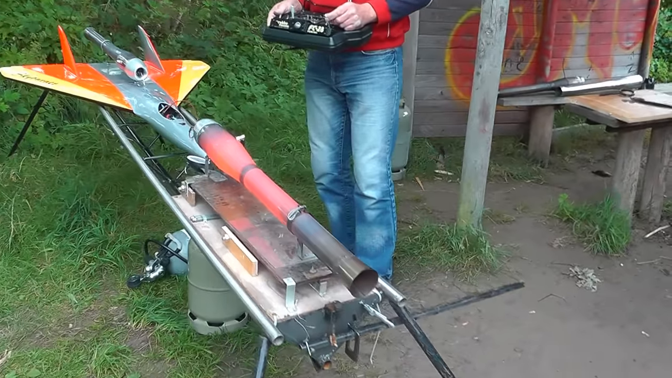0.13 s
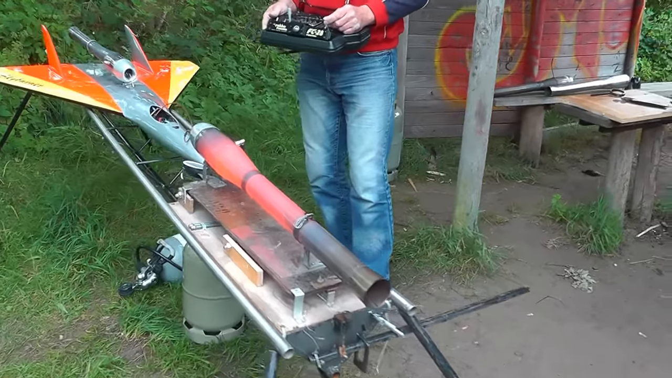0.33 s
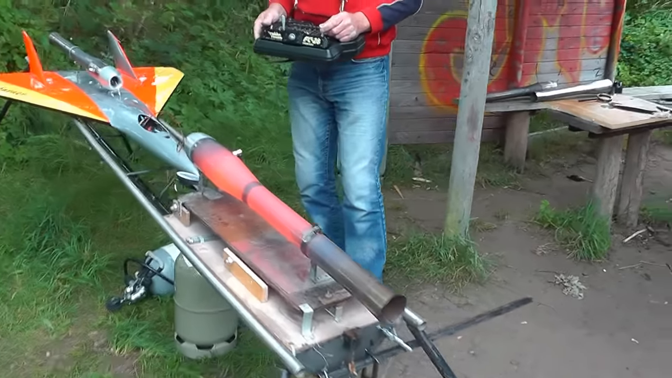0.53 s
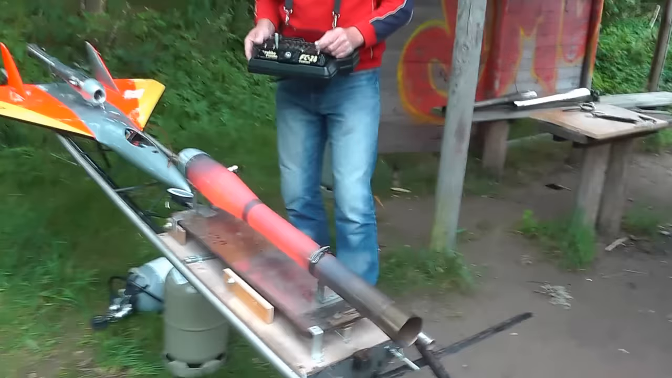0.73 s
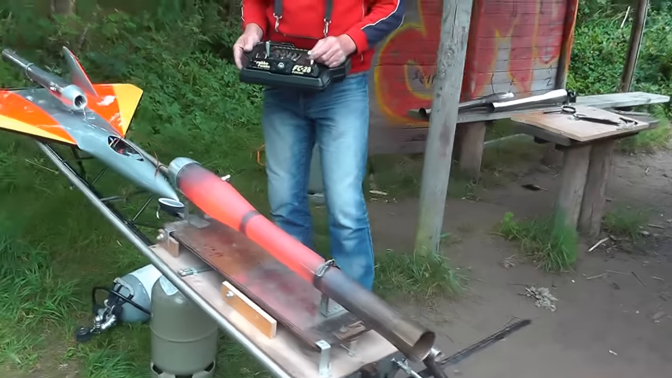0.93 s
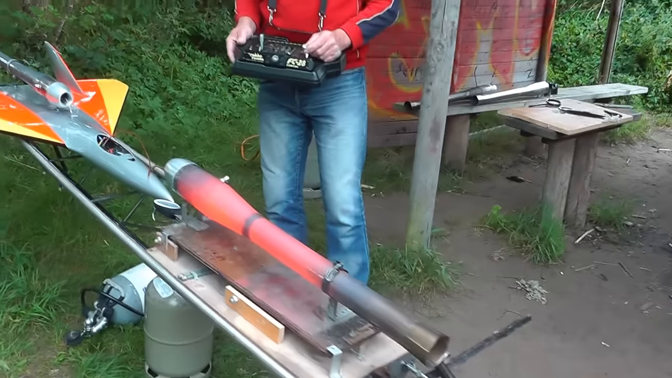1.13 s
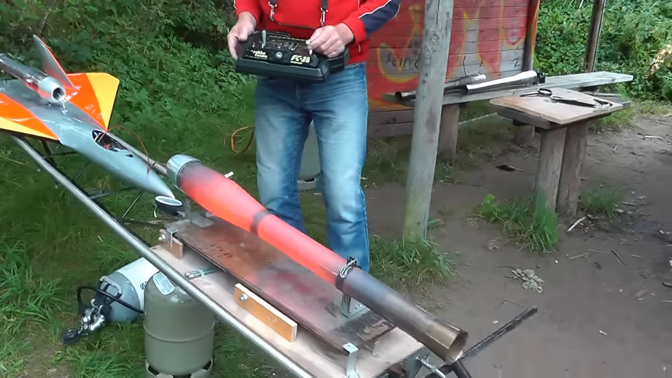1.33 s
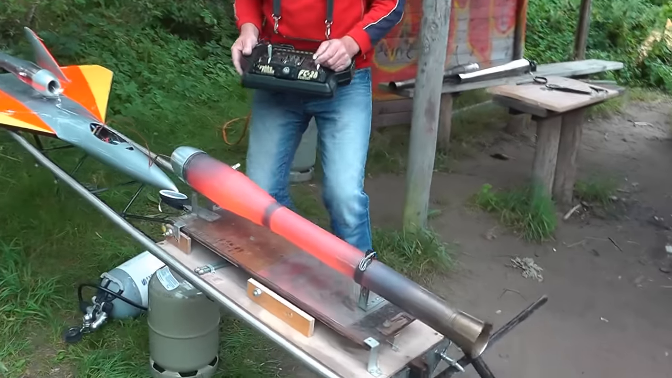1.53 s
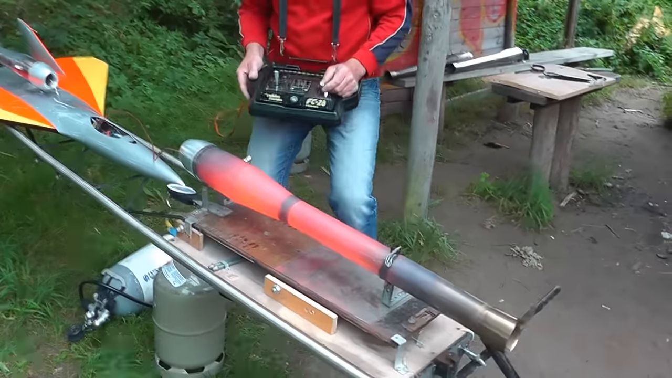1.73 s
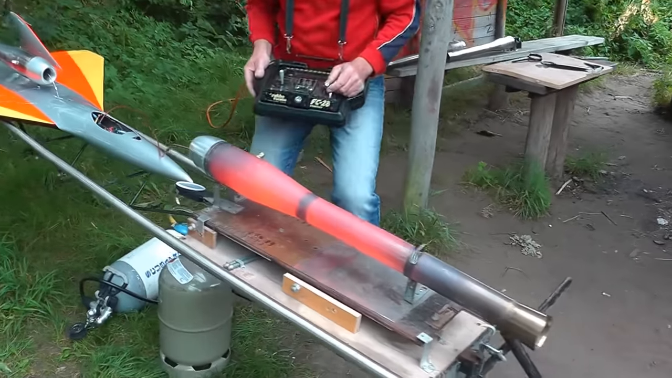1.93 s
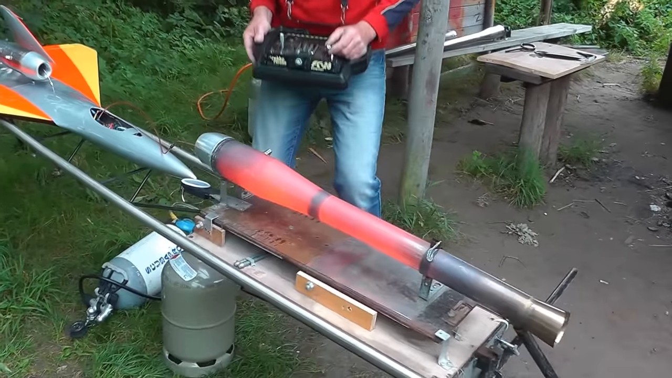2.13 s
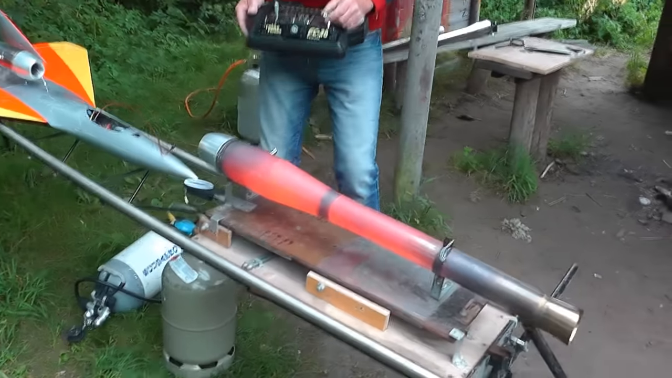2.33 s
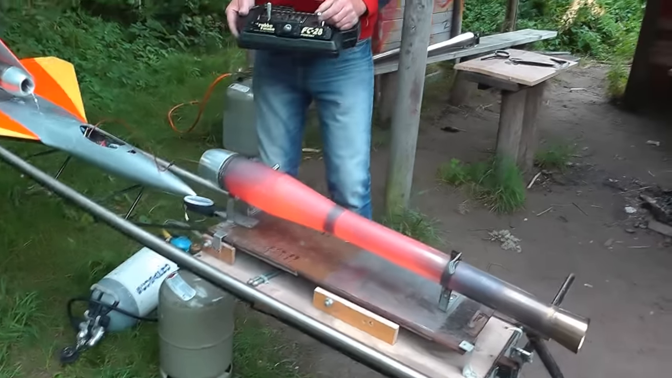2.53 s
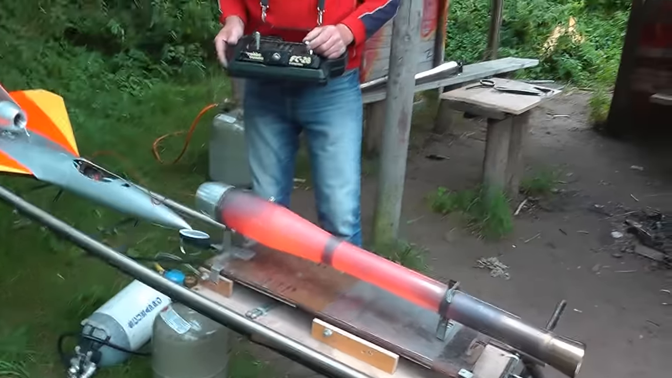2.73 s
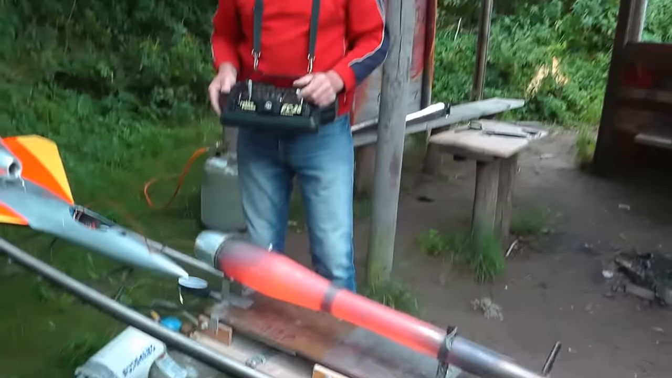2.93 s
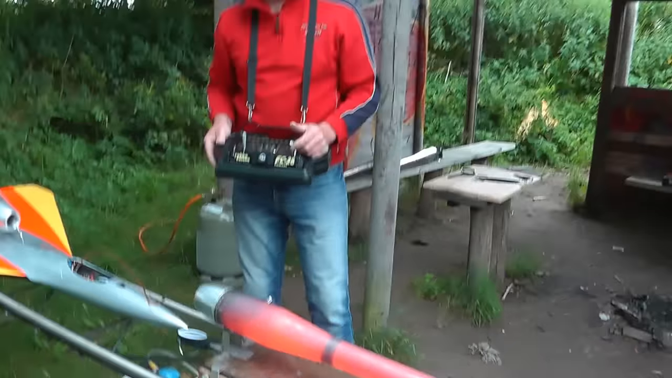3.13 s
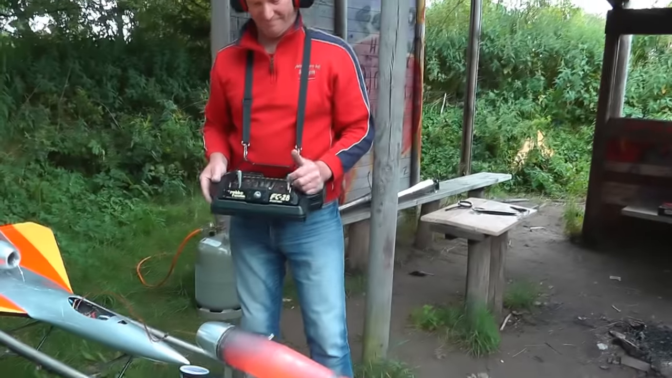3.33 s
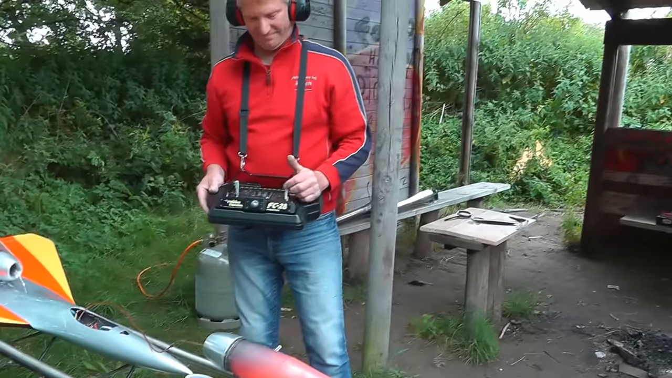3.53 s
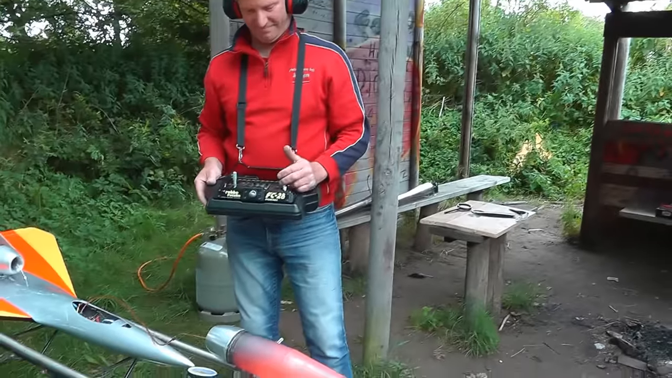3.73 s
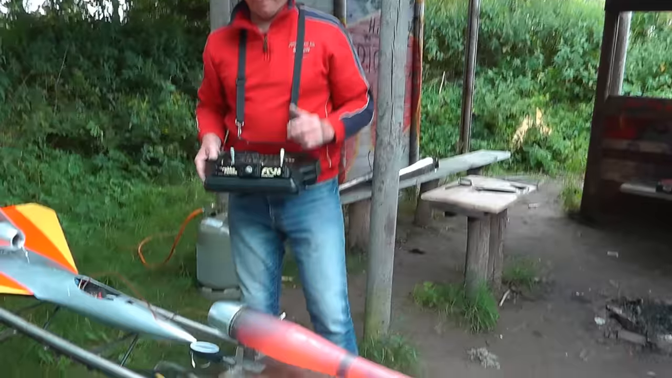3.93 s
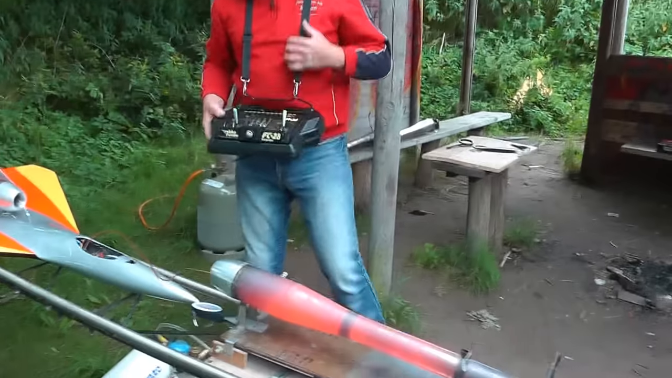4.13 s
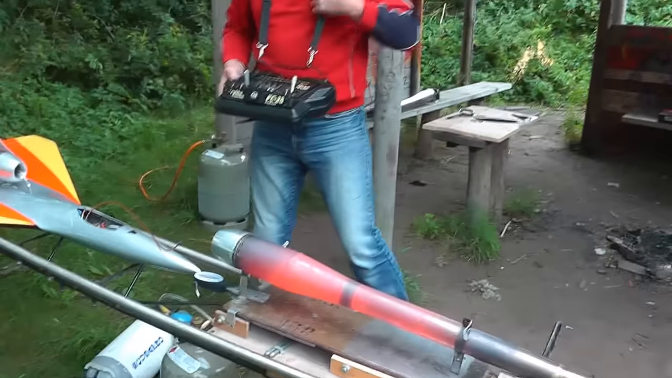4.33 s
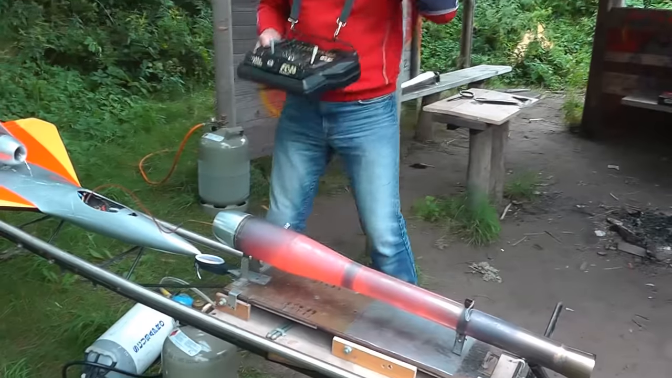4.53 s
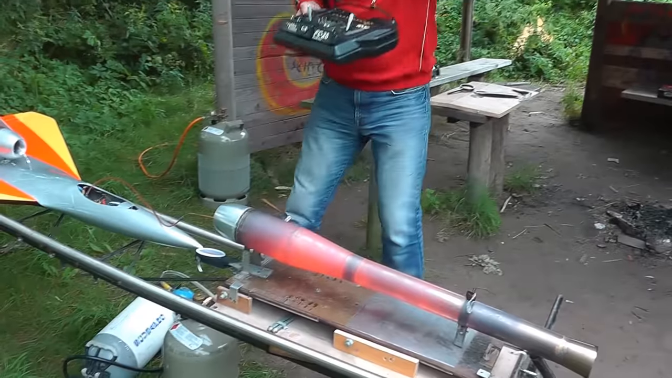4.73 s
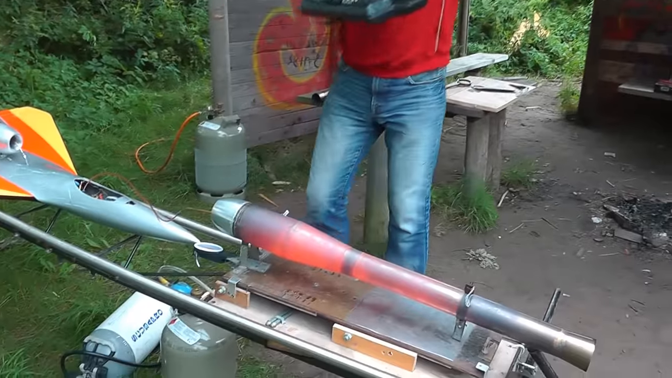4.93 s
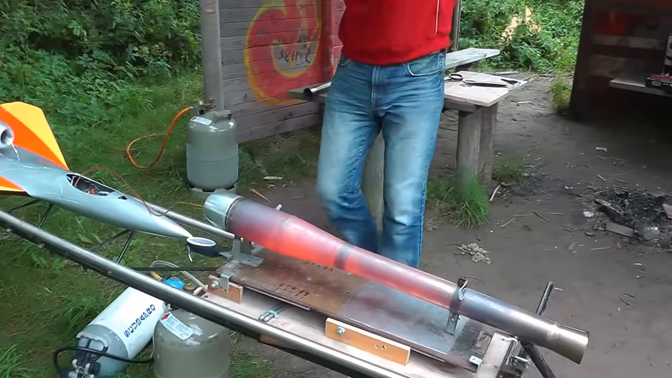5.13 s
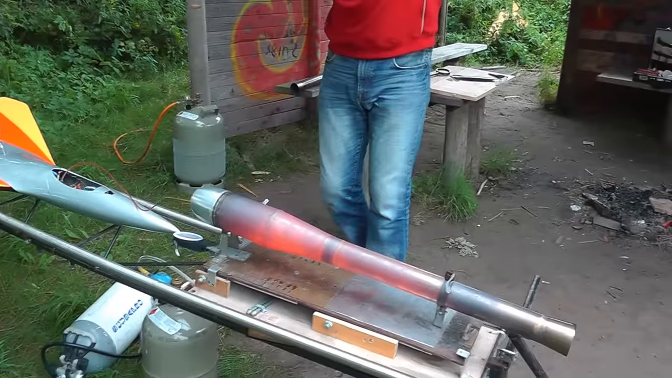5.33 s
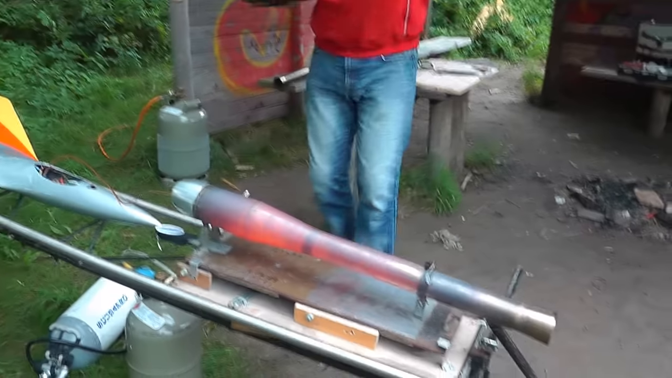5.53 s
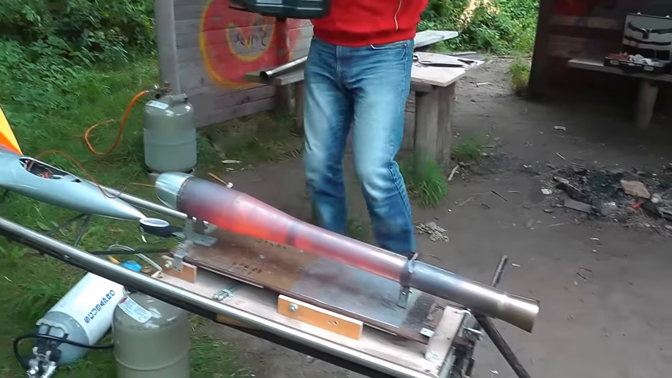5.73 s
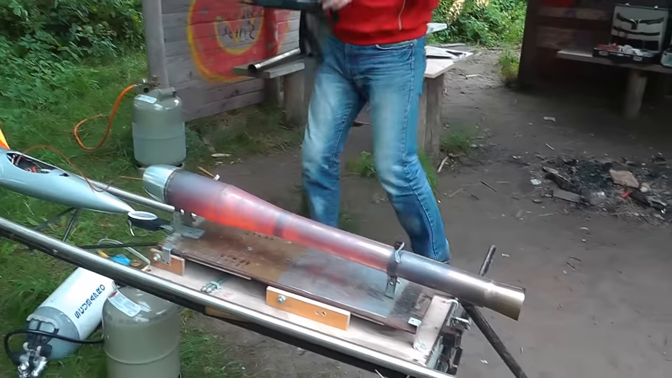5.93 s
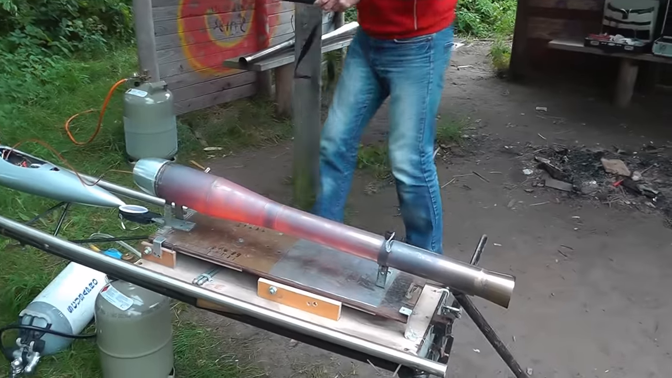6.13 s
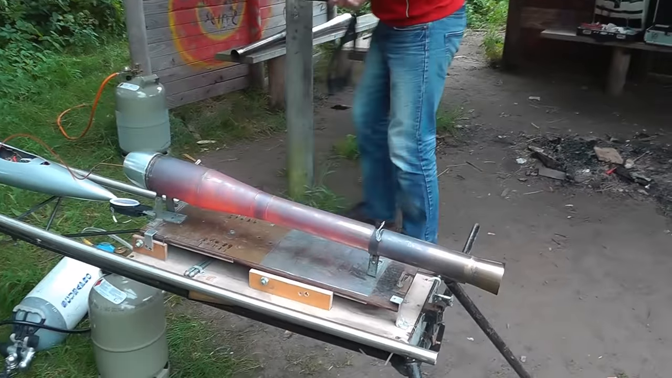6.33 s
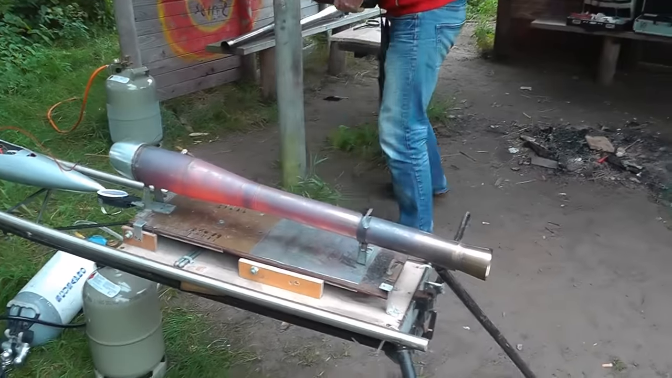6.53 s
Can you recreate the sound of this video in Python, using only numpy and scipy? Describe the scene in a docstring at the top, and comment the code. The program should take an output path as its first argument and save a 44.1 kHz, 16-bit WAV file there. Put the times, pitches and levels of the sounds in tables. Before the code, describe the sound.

Deafening steady rasping engine roar for three and a half seconds, sudden cut-off with echoing decay, then quiet pings, scuffs on dirt and small knocks.

```python
"""Pulsejet run and flame-out

A pulsejet runs on a test stand in a wooded yard: about 133 shock fronts a second in crackling jet noise,
plus a pipe tone, all driven by one firing cycle, while the camera moves from behind its nozzle to its side.
It flames out with a short hoot of gliding harmonics. As the camera's gain comes back up, the hot pipe ticks
(noise cracks ringing modes) and someone steps over the dirt (filtered grit) amid short knocks, some on plastic.
"""
import sys
import numpy as np
from scipy import signal
from scipy.fft import rfft, irfft
from scipy.io import wavfile
from scipy.ndimage import uniform_filter1d, minimum_filter1d

SR = 44100
rng = np.random.default_rng(int(sys.argv[2]) if len(sys.argv) > 2 else 0)


def store_pcm(level_fs):
    """Save levels as 16-bit WAV."""
    pcm = np.round(np.clip(level_fs, -1, 1) * 32767).astype(np.int16)
    wavfile.write(sys.argv[1], SR, np.atleast_2d(pcm).T)


N = 293685
T = np.arange(N) / SR
# fuel starts to run out; flame is gone
STARVE_S, OUT_S = 3.41, 3.486
# dry crack spectrum of slips, knocks and rustle: (frequency [Hz], level [dB per Hz])
CRACK_SPECTRUM = [(150, -8), (500, 0), (1200, 4.5), (2100, -2), (3300, -2), (5000, -4.5), (6500, -3),
                  (9000, -7), (15000, -5)]


def gain_of(db):
    """Decibels to amplitude."""
    return 10 ** (np.asarray(db) / 20)


def evened(x):
    """Scales to an rms of 1."""
    return x / np.sqrt(np.mean(x ** 2) + 1e-20)


def read(points, hz):
    """Interpolates a spectrum table on a log-frequency axis."""
    f, value = np.transpose(points)
    return np.interp(np.log(hz + 1), np.log(f + 1), value)


def curves(rows):
    """The columns of a time table at every sample."""
    s, *columns = np.transpose(rows)
    return [np.interp(T, s, c) for c in columns]


def add(mix, s, sound):
    """Mixes a sound in at time s."""
    part = mix[:, round(s * SR):][:, :sound.shape[-1]]
    part += sound[..., :part.shape[1]]


def wander(hz, size=8192):
    """Slow random curve of about rms 1, up to about hz."""
    f = np.fft.rfftfreq(size, T[-1] / size)
    slow = irfft(rfft(rng.standard_normal(size)) / (1 + (f / hz) ** 4))
    return evened(np.interp(T, np.linspace(0, T[-1], size), slow))


def colour(x, points, size=4096):
    """Causal minimum-phase filter with the given spectrum, so that attacks stay sharp."""
    log_gain = np.log(gain_of(read(points, abs(np.fft.fftfreq(size, 1 / SR)))))
    taps = np.fft.ifft(np.exp(signal.hilbert(log_gain).conj())).real[:size // 2]
    return signal.oaconvolve(np.atleast_2d(x), taps[None], axes=1)[:, :x.shape[-1]]


def spread(pair, side_db):
    """Two unrelated signals as the middle and the side of a stereo pair."""
    side = gain_of(side_db) * pair[1]
    return np.array([pair[0] + side, pair[0] - side])


def wide(side_db):
    """Two-channel white noise of a given width."""
    return spread(rng.standard_normal((2, N)), side_db)


def starving():
    """How far the fuel has run out: 0 at full burn, 1 when the flame is gone."""
    return np.clip((T - STARVE_S) / max(OUT_S - STARVE_S, .01), 0, 1)


def cycles():
    """Swings of the gas column so far: quicker as the fuel fails, slower as the pipe cools."""
    # wavers irregularly around 133 Hz: (time [s], firing rate [Hz])
    firing = [(.05, 131.4), (.11, 134.4), (.24, 133.9), (.39, 133), (.46, 133.1), (.52, 132.2),
              (.65, 134.3), (.72, 132.1), (.85, 132.1), (.89, 135.2), (.92, 132.4), (.96, 135.2),
              (1.05, 131.1), (1.11, 132.1), (1.135, 129.6), (1.16, 135.1), (1.24, 132), (1.31, 134.1),
              (1.37, 133), (1.58, 134.2), (1.68, 132.4), (1.72, 133), (1.75, 132.6), (1.78, 134.9),
              (1.82, 134.7), (1.86, 135.6), (1.92, 132.5), (2.01, 132), (2.05, 133.8), (2.1, 134.6),
              (2.13, 133), (2.17, 135.5), (2.22, 133.3), (2.27, 131.6), (2.34, 131.6), (2.39, 134.2),
              (2.45, 131.6), (2.56, 132.9), (2.69, 133.1), (2.72, 134.9), (2.92, 132.9), (2.98, 135.6),
              (3.01, 131.6), (3.05, 134.4), (3.14, 133.1), (3.2, 133.2), (3.27, 132.2), (3.34, 132.1),
              (3.38, 135.6)]
    free_hz, cold_hz, cool_s, cooling_s = 154.5, 133, 3.61, 0.12
    unsteady_share = .0015
    hz, = curves(firing)
    cooled = 1 - np.exp(-np.maximum(T - cool_s, 0) / cooling_s)
    hz = hz + (free_hz - hz) * starving() + (cold_hz - free_hz) * cooled
    return np.cumsum(hz * (1 + unsteady_share * wander(16))) / SR


def shocks(turns, jitter_s=.00013, uneven_db=-2.0):
    """One steep front a firing, never quite on time or equally strong, arriving by several paths."""
    # direct, then by ground and wall: (delay [s], level [dB])
    paths = [(0, 1.5), (.0012, -23), (.0028, -11.5)]
    fired = T[1:][np.diff(np.floor(turns)) > 0]
    out = np.zeros(N)
    for k, (delay_s, db) in enumerate(paths):
        late, size = rng.standard_normal((N // 100, 2))[:len(fired)].T
        at = np.clip((fired + delay_s + jitter_s * late) * SR, 0, N - 1).astype(int)
        out[at] += (-1) ** k * gain_of(db + uneven_db * np.minimum(size, 2))
    return evened(out - out.mean())


def stray_shocks(per_s=260, spread_db=0.5):
    """Eddies in the exhaust throw off hard cracks at random times."""
    size = gain_of(spread_db * np.minimum(rng.exponential(1, N), 2.5))
    cracks = size * (rng.random(N) < per_s / SR)
    return evened(cracks - cracks.mean())


def smear(x, smear_s=.0007):
    """Scattering round the camera draws each front out into a short rasp: delay grows with frequency."""
    hz = np.fft.rfftfreq(2 * N, 1 / SR)
    return irfft(rfft(x, 2 * N) * np.exp(-2j * np.pi * smear_s * hz ** 2 / SR))[:N]


def jet(turns, gate=0.18, gust_db=0.04, crackle_per_s=1400, crackle_spread_db=0.0, crackle_db=0.0):
    """Turbulence and small random shocks, swelling with the exhaust and with the intake of each cycle."""
    sign = rng.choice([-1, 1], (2, N))
    size = gain_of(crackle_spread_db * np.minimum(rng.exponential(1, (2, N)), 3.5))
    crackle = sign * size * (rng.random((2, N)) < crackle_per_s / SR)
    noise = rng.standard_normal((2, N)) + gain_of(crackle_db) * evened(crackle)
    swell = 1 + gate * np.cos(4 * np.pi * turns)
    return evened(noise * swell * gain_of(gust_db * wander(50)))


def pipe_tone(turns, angle, flutter_db=2.0, drift_db=0.95, port_phase_rad=0.55):
    """Standing wave in the pipe; overtones shift differently at the two ports and as the camera moves."""
    # (multiple of firing rate, then level [dB] at five camera positions from behind to side-on)
    overtones = [(1, -12, -5, -14.5, -8, -6.5), (2, -7.5, -16.5, -6.5, 3, 2),
                 (3, 1.5, -3, -14.5, -2.5, -3.5), (4, -3.5, 6, 4.5, -1, 4.5), (5, 2.5, 2.5, -5.5, 5, 3.5),
                 (6, 0.5, 1.5, -1, 6, 2), (7, -2.5, -7, -6.5, -0.5, -2), (8, -15.5, -14.5, 2, -4.5, -0.5),
                 (9, 3, 0.5, -2, -1.5, 5), (10, -10.5, -13.5, -10, -12, -14), (11, -5.5, -1, 1, -9.5, 2.5),
                 (12, -11, -4.5, -7, -3.5, -12.5), (13, -7.5, -17.5, -13.5, -15, -9),
                 (14, -15, -9, -15, -9.5, -11)]
    out = np.zeros((2, N))
    for k, *around_db in overtones:
        level_db = np.interp(angle, [0, .25, .55, .85, 1], around_db)
        level = gain_of(level_db + flutter_db * wander(14) + drift_db * wander(0.69))
        phase = 2 * np.pi * (round(k) * turns + rng.random())
        phase = phase + .2 * wander(20) + .25 * wander(6) + .8 * wander(1)
        apart = port_phase_rad * (rng.choice([-1, 1]) + 0.11 * wander(2.8))
        out += level * np.cos([phase + apart, phase - apart])
    return evened(out)


def lean(pair):
    """The nozzle lies to the right, so that side hears more of the rasp."""
    # left minus right: (frequency [Hz], level [dB])
    balance = [(60, 2.5), (300, 2), (700, -2.5), (2500, -3.5), (5000, -0.5), (10000, -2), (15000, 0.5)]
    sides = zip(pair, (1, -1))
    return np.vstack([colour(x, [(hz, sign * db / 2) for hz, db in balance]) for x, sign in sides])


def engine(turns, roar_db=10.5, tone_db=6.5, shock_db=-8.0, stray_db=-2.5, shock_beam_db=2.0,
           flicker_db=0.64, closer_db=1.0, edge_db=-0.6,
           starved_roar_db=-1.8, starved_edge_db=-8.0, starved_tone_db=-6.0):
    """The roar (shocks and jet noise) and the pipe tone, both driven by the firing cycle."""
    # (time [s], camera position: 0 behind the nozzle, 1 side-on)
    position = [(0.35, 0), (.95, 0.28), (1.5, 0.52), (2.05, 0.85), (2.5, 0.96)]
    # jet noise: (frequency [Hz], level [dB per Hz])
    roar_spectrum = [(25, -16), (60, -8), (120, -1), (200, -1.5), (400, 0), (800, 1.5), (1150, -0.5),
                     (1600, -1.5), (2200, -5), (3500, -8.5), (4800, -15), (6000, -10.5), (8200, -11.5),
                     (15500, -20.5)]
    # change of the roar side-on: (frequency [Hz], level [dB])
    side_on = [(100, 0), (700, -2), (1500, -2), (3000, 0.5), (4700, 2.5), (6000, -1), (8000, -3),
               (15000, -1.5)]
    # width of the jet noise: (frequency [Hz], side minus mid [dB])
    width = [(60, -1), (380, 1), (700, -2), (2400, -5.5), (4400, -19.5), (8100, -10.5), (15000, -1)]
    # after flame-out; the treble loses the second figure on top
    die_db_per_s, dull_db_per_s = 314, 121

    angle, = curves(position)
    starved, dead_s = starving(), np.maximum(T - OUT_S, 0)
    burn_db = closer_db * angle + starved_roar_db * starved - die_db_per_s * dead_s
    sharp_db = edge_db + starved_edge_db * starved - dull_db_per_s * dead_s
    mid, side = jet(turns)
    fronts = smear(shocks(turns) + gain_of(stray_db) * stray_shocks())
    fronts = colour(fronts, [(200, -4.0), (1500, -1.5), (4000, -2.5), (9000, 0.0)])[0]
    # fronts crack hardest straight behind the nozzle
    fronts = fronts * gain_of(-shock_beam_db * angle)
    roar = spread([mid + gain_of(shock_db) * fronts, colour(side, width)[0]], 0)
    roar = evened(colour(roar, roar_spectrum))
    roar = (1 - angle) * roar + angle * colour(roar, side_on)
    # the treble flickers and dulls as the fuel fails
    body = signal.sosfiltfilt(signal.butter(2, 1700, fs=SR, output="sos"), roar)
    edge = (roar - body) * gain_of(sharp_db + flicker_db * wander(22))
    tone = gain_of(tone_db + burn_db + starved_tone_db * starved) * pipe_tone(turns, angle)
    return lean(gain_of(roar_db + burn_db) * (body + edge)), lean(tone)


def tail(x, decay):
    """Diffuse reflections as decaying noise, each band dying at its own speed."""
    hz, t, z = signal.stft(rng.standard_normal((2, SR)), SR, nperseg=256)
    taps = signal.istft(z * 10 ** (-3 * t / read(decay, hz)[:, None]), SR, nperseg=256)[1]
    taps /= np.sqrt(np.mean(abs(rfft(taps)[:, 300:2000]) ** 2))
    return signal.fftconvolve(x, taps, axes=1)[:, :N]


def stirring():
    """Rises from 0 to 1 as the small sounds round the stand begin."""
    stir_s, rise_s = 4.86, .4
    return np.clip((T - stir_s) / rise_s, 0, 1)


def air(hush_db=-52.5, swell_db=-0.6, rustle_per_s=160, rustle_db=-70.0):
    """Outdoor hush as filtered noise, with tiny crackles of grit and clothes once the operator moves."""
    # (frequency [Hz], level [dB per Hz])
    hush_spectrum = [(30, -18), (70, -2.5), (130, -5.5), (260, 2), (500, -0.5), (900, -3.5), (1100, -6.5),
                     (1650, -7.5), (1810, -19.5), (2050, -14), (3400, -14.5), (5000, -21.5), (8000, -20.5),
                     (15500, -40)]
    hush = evened(colour(wide(-7.5), hush_spectrum)) * gain_of(swell_db * wander(11))
    specks = wide(-9.0) * (rng.random(N) < rustle_per_s / SR)
    rustle = stirring() * evened(colour(specks, CRACK_SPECTRUM))
    return gain_of(hush_db) * hush + gain_of(rustle_db) * rustle


def camera(whirr_db=-66.5, bump_s=0.0016):
    """The camera's hum (sines) and whirr (noise), and soft bumps of the hand that holds it (pulses)."""
    # (frequency [Hz], level [dB])
    hum = [(113, -69.5), (150.7, -74.5), (264, -75.5), (533, -78.5), (662, -81), (1061, -74.5),
           (1276, -77.5), (2143, -82)]
    # (frequency [Hz], level [dB per Hz])
    whirr_spectrum = [(30, -15.5), (90, 5.5), (250, -3), (380, -8.5), (520, -5.5), (1000, -0.5), (1600, -8),
                      (1800, -11), (2100, -12.5), (2700, -17.5), (6000, -31.5), (15000, -48.5)]
    # (time [s], level [dB])
    bumps = [(3.943, -47.5), (4.365, -49)]
    out = gain_of(whirr_db) * evened(colour(wide(-8.5), whirr_spectrum))
    for hz, db in hum:
        out += np.sqrt(2) * gain_of(db) * np.sin(2 * np.pi * hz * T + 0.28 * wander(5))
    u = np.arange(SR // 20) / SR / bump_s
    for s, db in bumps:
        add(out, s, gain_of(db) * u * (2 - u) * np.exp(1 - u))
    return out


def flameout(turns, rough_db=4.5, purity=0.25, unrest_rad=0.28, throb_hz=20, throb_depth=.9):
    """The gas column hoots roughly, its overtones fading first; a weak low tone lingers, throbbing."""
    # overtones at full swing: (multiple, level [dB], lag of the peak [s])
    hoot = [(1, -11, .014), (2, -18, 0.026), (3, -18, 0), (4, -1, 0), (5, -16.5, 0.0027), (8, -18, 0.0039)]
    hoot_s, hoot_db, swell_db_per_s, fade_db_per_s = 3.477, 17.5, 402.5, 365.5
    linger_db, linger_db_per_s = -31.5, 35
    out = np.zeros(N)
    for k, level_db, lag_s in hoot:
        since = T - hoot_s - lag_s
        db = np.minimum(swell_db_per_s * since, -fade_db_per_s * since) * (1 + purity * (k > 2.5))
        phase = 2 * np.pi * (round(k) * turns + rng.random()) + unrest_rad * k * wander(60)
        out += gain_of(hoot_db + level_db + db) * np.cos(phase)
    throb = 1 + throb_depth * np.cos(2 * np.pi * throb_hz * (T - OUT_S) + .5 * wander(8))
    linger = gain_of(linger_db - linger_db_per_s * abs(T - OUT_S)) * starving()
    return out * gain_of(rough_db * wander(33)) + linger * throb * np.cos(2 * np.pi * turns)


def whine(whine_hz=885.5, waver=0.0007):
    """A thin sine of nearly steady pitch that swells and fades."""
    # (time [s], level [dB])
    swell = [(3.7, -72), (4.7, -68.5), (5.0, -62), (5.6, -58), (6.1, -83)]
    db, = curves(swell)
    hz = whine_hz * (1 + waver * wander(4.7))
    return np.sqrt(2) * gain_of(db) * np.sin(2 * np.pi * np.cumsum(hz) / SR)


def ringing(t, modes, spot_hz, spot_db=7.5, spot_octaves=0.16, detune=0.0027, split=0.0042,
            partner_db=-7.0, partner_life=2.2):
    """Modes in beating pairs, the weaker partner singing on; the spot hit favours those near spot_hz."""
    ring = np.zeros((2, len(t)))
    for hz, level_db, t60 in modes:
        favour_db = spot_db * np.exp(-(np.log2(hz / spot_hz) / spot_octaves) ** 2)
        hz = hz * (1 + detune * rng.standard_normal())
        partner_hz = hz * (1 + split * rng.standard_normal())
        first, second = (np.sin(2 * np.pi * (f * t + rng.random((2, 1)))) for f in (hz, partner_hz))
        pair = first * gain_of(-60 * t / t60) + second * gain_of(partner_db - 60 * t / (t60 * partner_life))
        ring += gain_of(level_db + favour_db) * pair
    return ring


def strikes(rows, modes, side_db, body_t60, body_db, chatter_db=2.0, dry_share=0.52):
    """Each blow is a short, chattering crack that also rings the object, another mode mix at each spot."""
    out, t = np.zeros((2, N)), np.arange(SR // 3) / SR
    head = SR // 100  # levels are set over the first 10 ms
    for s, db, dull_hz, length_s, ring_db, spot_hz in rows:
        ring = ringing(t, modes, spot_hz)
        body = gain_of(body_db + dry_share * min(ring_db, 0) - 60 * t / body_t60)
        grip = (np.exp(-t / length_s) + body) * gain_of(chatter_db * wander(300)[:len(t)])
        crack = colour(rng.standard_normal((2, len(t))) * grip, CRACK_SPECTRUM)
        blow = crack / crack[:, :head].std() + gain_of(ring_db) * ring / ring[:, :head].std()
        blow *= 1 - np.exp(-t / (0.35 * length_s))  # a long slip also starts softly
        dull = signal.butter(2, min(dull_hz, SR / 2 - 1), fs=SR, output="sos")
        blow = signal.sosfilt(dull, spread(blow, side_db))
        add(out, s, gain_of(db) * blow / blow[:, :head].std())
    return out


def pipe_ticks():
    """The cooling pipe slips in its clamps, each slip ringing its modes."""
    # (time [s], level [dB], dull above [Hz], slip length [s], ringing against crack [dB], favoured mode [Hz])
    slips = [(4.318, -51, 5000, 0.0021, -6, 3210), (4.337, -47, 8960, 0.0017, -6, 4500),
             (4.541, -31.5, 9000, 0.0017, 3, 2150), (4.760, -40.5, 2600, 0.013, -8, 523),
             (5.110, -44, 7005, 0.0007, -15, 2137), (5.195, -38, 8950, 0.002, 2, 3130),
             (5.238, -54, 8000, .003, 4, 8800), (5.364, -38.5, 13000, 0.0018, 9, 1270),
             (5.405, -51, 6900, 0.0033, 13, 4640), (5.440, -36, 2500, .002, 0, 1260),
             (5.444, -35, 4500, 0.002, 0, 4600), (5.448, -37, 2500, 0.0028, 2, 517),
             (5.452, -40, 2500, 0.0017, 2, 523), (5.468, -39, 6960, 0.0022, -1, 4600),
             (5.475, -45.5, 4500, .002, 0, 1260), (5.520, -49, 15000, 0.0014, -10, 880),
             (5.563, -40.5, 4000, 0.0026, -6, 4600)]
    # (frequency [Hz], level [dB], t60 [s])
    pipe_modes = [(498, 2, 0.11), (540, -2, 0.12), (880, -3, .08), (1153, -2, .05), (1257, -2, 0.06),
                  (1680, -8, 0.08), (2140, -6, 0.097), (2700, -18, .05), (3220, -3, 0.038),
                  (3460, -9, 0.055), (4460, -8, 0.062), (4580, -1, 0.029), (4780, -3, 0.029),
                  (5430, 0, 0.036), (5740, -6, 0.055), (7390, -9, .08), (8000, -5, 0.08), (8400, -4, 0.073),
                  (8880, -4, .06)]
    return strikes(slips, pipe_modes, side_db=-24, body_t60=0.14, body_db=-13)


def ticking(tick_db=-69.0, tick_s=.0012, uneven_db=-3.0):
    """A faint, dry, regular ticking of decaying noise bursts, as of a small mechanism."""
    one_tick_s, ticks_per_s = 5.677, 13.34
    since = (T - one_tick_s) % (1 / ticks_per_s)
    clicks = wide(-11.0) * np.exp(-since / tick_s) * gain_of(uneven_db * wander(10))
    clicks = evened(colour(clicks, [(500, -15), (3000, 0), (8000, -10), (15000, -8)]))
    return gain_of(tick_db) * stirring() * clicks


def steps(heel_hz=200, heel_s=0.005, grit_db=4.0, clump_db=2.0, pebbles_per_s=700, pebble_db=-4.0):
    """A heel lands, then the sole rolls over clumps of grit and single pebbles that snap."""
    # (time [s], scuff level [dB], length [s], heel thud level [dB])
    footfalls = [(5.187, -51, 0.081, -47), (5.863, -48, 0.014, -40), (5.886, -45.5, 0.1, -54),
                 (6.352, -49, 0.043, -60), (6.401, -49.5, 0.071, -59)]
    # (frequency [Hz], level [dB per Hz])
    scuff = [(59, -45), (100, -26), (208, 1), (367, 1), (867, 3), (1350, -5), (1590, -3), (3000, -13),
             (4600, -19), (7500, -18.5), (15000, -31)]
    out, t = np.zeros((2, N)), np.arange(SR // 3) / SR
    for s, db, length_s, heel_db in footfalls:
        grit = rng.standard_normal((2, len(t)))
        grit = grit * gain_of(grit_db * wander(400) + clump_db * wander(49))[:len(t)]
        pebbles = rng.standard_normal((2, len(t))) * (rng.random(len(t)) < pebbles_per_s / SR)
        crunch = colour(evened(grit) + gain_of(pebble_db) * evened(pebbles), scuff)
        roll = np.interp(t, [0, .003, 0.6 * length_s, length_s], [0, 1, 1, 0])
        thud = t / heel_s * np.exp(2 - 2 * t / heel_s) * np.sin(2 * np.pi * heel_hz * t)
        add(out, s, gain_of(db) * evened(spread(crunch, -16.0)) * roll + gain_of(heel_db) * thud)
    return out


def short_knocks():
    """Short knocks with ringing modes, some on a plastic case, some within the footsteps."""
    # (time [s], level [dB], dull above [Hz], knock length [s], ringing against crack [dB], favoured mode [Hz])
    knocks = [(5.863, -51, 5000, .003, 2, 3400), (5.917, -55, 8000, .003, -4, 1440),
              (5.948, -48, 3000, .002, -2, 1120), (5.991, -57, 12000, .0007, -15, 4400),
              (6.029, -46.5, 3500, 0.0023, -8, 1450), (6.226, -47.5, 3500, 0.0082, -9, 2900),
              (6.237, -45, 4500, .004, -6, 3200), (6.358, -51, 9000, 0.0028, -14, 800),
              (6.378, -59, 2000, .002, 3, 1440), (6.409, -51, 11000, 0.0035, -21, 800),
              (6.438, -50, 1100, .003, 3, 795), (6.488, -47, 2500, 0.0037, -10, 2000),
              (6.608, -38.5, 3600, 0.0022, 3, 2000), (6.613, -41, 3600, 0.0029, 0, 2000),
              (6.631, -46, 3800, 0.0083, -8, 3200)]
    # (frequency [Hz], level [dB], t60 [s])
    knock_modes = [(800, -8, .05), (1130, -15, .035), (1480, -10, 0.049), (1570, -7, .04),
                   (2000, -4, 0.038), (2300, 1, .032), (2900, 0, .04), (3240, -6, 0.074), (3630, -4, .04),
                   (4400, -8, .05)]
    return strikes(knocks, knock_modes, side_db=-22, body_t60=0.15, body_db=-7.5)


def scene(shed_db=-11.0, woods_db=-37.0):
    """Roar, hoot and small sounds thrown back by the shed and woods; the pipe tone stays dry."""
    # narrow dips, slightly hollow: (frequency [Hz], level [dB])
    hollow = [(1700, -1), (1800, -9.5), (1920, 2), (2260, -1), (2380, -8), (2500, 0), (2990, -0.5),
              (3060, -8), (3140, 1)]
    # boards and trees: (delay [s], level [dB])
    echoes = [(0.071, -26.5), (0.117, -31), (.16, -41)]
    # decay of the nearby shed: (frequency [Hz], t60 [s])
    shed = [(40, 0.037), (150, 0.27), (600, 0.15), (3000, 0.34), (12000, 0.36)]
    # decay of the woods: (frequency [Hz], t60 [s])
    woods = [(130, .5), (250, 0.99), (800, 2.1), (3000, 1.5), (8000, .6), (15000, .3)]
    turns = cycles()
    roar, tone = engine(turns)
    blows = pipe_ticks() + short_knocks()
    near = roar + flameout(turns) + colour(blows + steps() + ticking(), hollow)
    # boards and leaves give back little of the highest treble
    thrown = colour(near, [(30, -6.0), (150, -3.0), (2500, 1.0), (6000, -4.0), (14000, -16)])
    echo = np.zeros((2, N))
    for delay_s, db in echoes:
        add(echo, delay_s, gain_of(db) * thrown[::-1])  # sides swapped
    diffuse = gain_of(shed_db) * tail(thrown, shed) + gain_of(woods_db) * tail(thrown, woods)
    return near + tone + diffuse + echo + air()


def record(dry, limit_db=-7.5, hold_s=0.97, recover_db_per_s=23.0, ceiling_db=0.0, edge_hz=15720):
    """Gain control holds the engine down, waits, then recovers; peaks clip with a fairly hard knee; band limit."""
    power = abs(uniform_filter1d((dry ** 2).mean(0), size=2200))
    power_db = 10 * np.log10(power + 1e-12)
    hold = round(hold_s * SR)
    over_db = -minimum_filter1d(np.minimum(limit_db - power_db, 0), hold, origin=(hold - 1) // 2)
    fall_db = T * recover_db_per_s
    cut_db = np.maximum.accumulate(over_db + fall_db) - fall_db
    # hum, whirr, bumps and whine bypass the gain control
    out = dry * gain_of(-cut_db) + camera() + whine()
    out = out / (1 + (out / gain_of(ceiling_db)) ** 6) ** (1 / 6)
    low_pass = signal.firwin(1023, edge_hz, window=("kaiser", 9), fs=SR)
    return signal.oaconvolve(out, low_pass[None], "same")


dry = scene()
out = record(dry)
store_pcm(out)
```